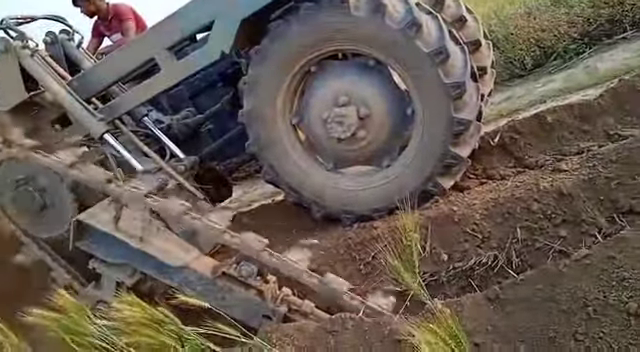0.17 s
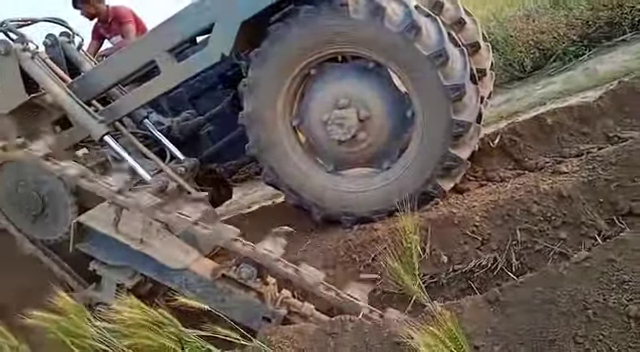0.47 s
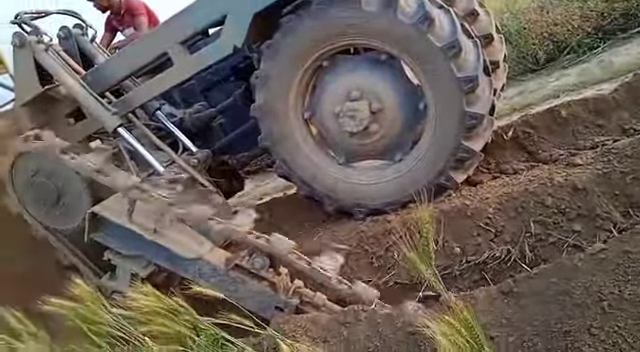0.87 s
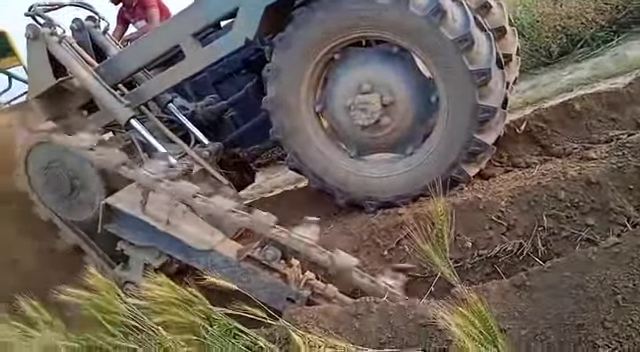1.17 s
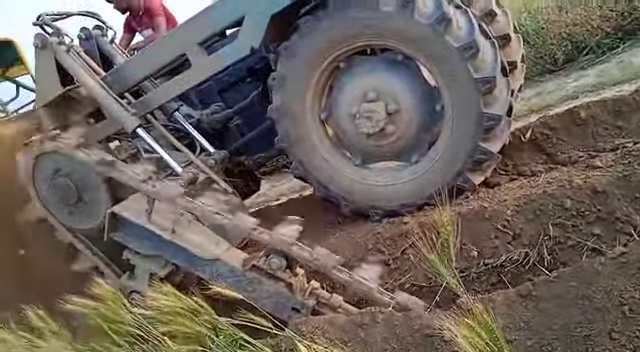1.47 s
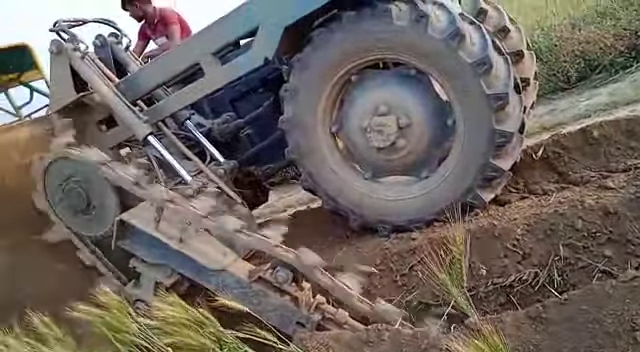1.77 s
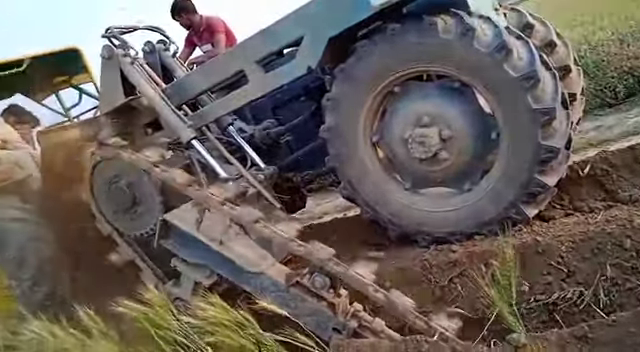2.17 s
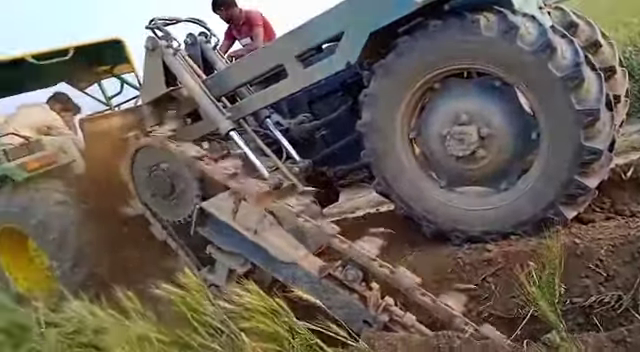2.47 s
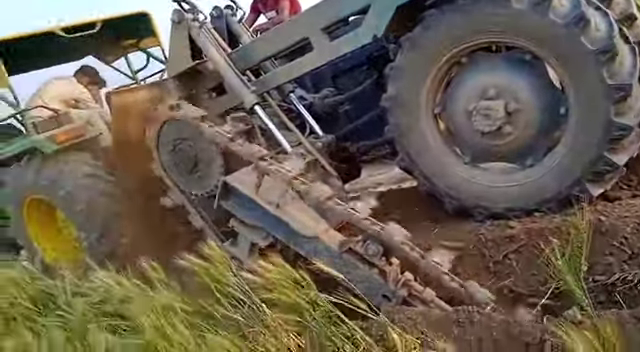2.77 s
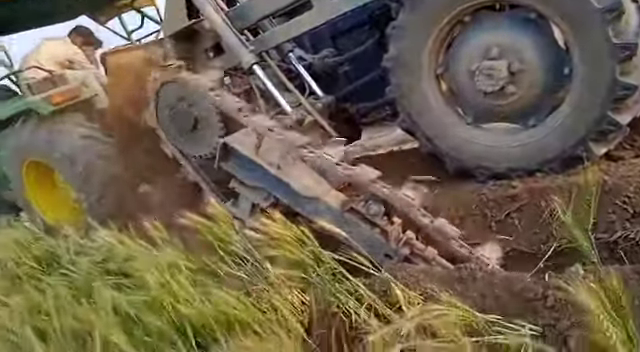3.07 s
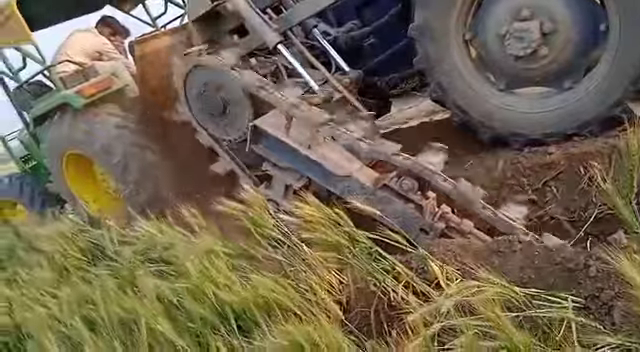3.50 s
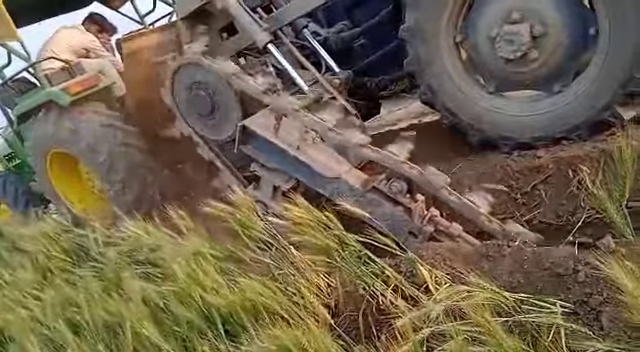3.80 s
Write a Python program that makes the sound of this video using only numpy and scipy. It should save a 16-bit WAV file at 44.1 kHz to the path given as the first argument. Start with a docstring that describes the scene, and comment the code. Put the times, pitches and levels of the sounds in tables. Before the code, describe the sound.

A four-cylinder tractor diesel knocks rapidly and unevenly throughout, with trencher chain links ticking and clinking over gritty soil roar; a second tractor drones faintly behind. Open field, close phone microphone, squashed peaks and little deep bass.

```python
"""A four-cylinder diesel tractor knocks and drones while its chain trencher clinks through soil.
Each firing strikes the block, whose modes ring and decay, and sends a puff through the exhaust resonances.
Loose steel links and stones ring the same way; a narrow noise band makes the gear whine.
Soil and fan are patchy shaped noise below, and a second tractor drones in the background."""
import sys
import numpy as np
from scipy import signal
from scipy.fft import rfft, irfft, next_fast_len
from scipy.io import wavfile
from scipy.ndimage import uniform_filter1d, map_coordinates

SR = 44100
rng = np.random.default_rng(int(sys.argv[2]) if len(sys.argv) > 2 else 0)


def persist_wave(psi):
    """Save psi, clipped to +-1, as 16-bit WAV."""
    counts = np.round(np.clip(psi, -1, 1) * 32767).astype(np.int16)
    wavfile.write(sys.argv[1], SR, np.atleast_2d(counts).T)


def boost(x):
    """Linear amplitude factor 10**(x/20) for a level x in decibels (scalar or array-like)."""
    u = np.asarray(x, float) / 20
    return 10 ** u


N = 173754

# Engine speed. Each row: time in seconds, engine cycles per second.
ENGINE_SPEED = [(0, 17.84), (1.7, 17.83), (1.95, 17.99), (2.3, 17.9), (2.6, 17.83), (2.95, 17.6),
                (3.3, 17.83), (3.94, 17.9)]
# Engine effort. Each row: time in seconds, level in dB before the gain of each source.
EFFORT = [(0.03, -26.5), (0.58, -25.5), (0.87, -26.5), (1.67, -28), (1.96, -27.5), (2.07, -26), (2.33, -26),
          (3.0, -27.5), (3.62, -27), (3.9, -28)]
# Rattle of chain and valves. Each row: time in seconds, level in dB before the gain of each source.
RATTLE_LEVEL = [(0.03, -33), (0.7, -37), (1.11, -36.5), (1.64, -37), (2.18, -32), (2.3, -33.5), (2.65, -37),
                (3.26, -42), (3.37, -39), (3.9, -36.5)]
# Knock strength of the cylinders in firing order, relative level in dB.
CYLINDER_FORCE = [-2.5, 0.5, -4.5, -4.5]
# Modes of the engine block. Each row: centre in Hz, spread in Hz, relative level in dB.
BLOCK_MODES = [(910, 90, -8), (1040, 90, -8), (1345, 130, -4), (1725, 130, 0), (2070, 250, -17),
               (2459, 350, -3.5), (3165, 300, -5)]
# Hard knocks. Each row: start in seconds, level in dB before the common gain, ring in Hz.
HARD_KNOCKS = [(0.015, -15, 2710), (0.0542, -10.5, 1640), (0.113, -16, 1830), (0.167, -9.5, 1730),
               (0.1832, -5.5, 1730), (0.223, -12, 1775), (0.3014, -18.5, 2460), (0.368, -15.5, 1040),
               (0.386, -14.5, 1150), (0.449, -14.5, 1610), (0.55, -18.5, 2466), (0.615, -17, 1295),
               (0.6563, -15.5, 2484), (0.7814, -12, 1644), (0.8404, -19, 1640), (1.0096, -14.5, 2030),
               (1.291, -25.5, 1780), (1.3467, -19.5, 1617), (1.4004, -13.5, 1870), (1.4152, -17.5, 2326),
               (1.5186, -15, 1297), (1.583, -15.5, 1350), (1.6263, -20, 2416), (1.682, -11.5, 1670),
               (1.7869, -20, 2380), (1.8487, -23.5, 2300), (1.8602, -17.5, 2000), (1.8735, -15.5, 2406),
               (1.9043, -14.5, 1930), (1.9602, -10.5, 1765), (2.0133, -18.5, 1700), (2.0308, -15, 1350),
               (2.0705, -10.5, 1570), (2.1286, -13, 1787), (2.1821, -14, 1680), (2.1998, -12, 1740),
               (2.3457, -15, 1875), (2.358, -12.5, 1720), (2.4039, -21, 2370), (2.4176, -12, 1807),
               (2.4571, -14.5, 1350), (2.5288, -13, 1280), (2.5575, -18, 2640), (2.6854, -10.5, 1726),
               (3.0215, -33, 1910), (3.0744, -25, 1697), (3.1969, -14, 1750), (3.2104, -12.5, 1660),
               (3.3633, -17.5, 1630), (3.432, -12, 1790), (3.5956, -19.5, 2280), (3.7519, -18.5, 2350),
               (3.8059, -18, 2404), (3.8756, -17.5, 1714), (3.915, -18, 1506), (0.6714, -14, 1900),
               (0.6824, -12.5, 1070), (2.6974, -11, 1490), (2.9244, -16, 1604)]
# Loud chain clinks. Each row: start in seconds, level in dB before the common gain, ring in Hz.
LOUD_CLINKS = [(0.0525, -36, 6680), (0.1401, -22.5, 6630), (0.2234, -18, 6630), (0.3072, -15.5, 6580),
               (0.3571, -17, 7220), (0.416, -26.5, 6000), (0.5387, -20, 6000), (0.615, -19, 6240),
               (0.6603, -26.5, 6150), (0.6784, -19, 6220), (0.6982, -17, 6150), (0.74, -25, 6200),
               (0.8187, -24.5, 7130), (0.995, -15, 7040), (1.186, -27.5, 6120), (1.208, -23, 6130),
               (1.4188, -19, 6110), (1.541, -20.5, 7030), (1.569, -21.5, 6420), (1.734, -18, 6470),
               (1.8347, -18.5, 6750), (1.921, -16, 6040), (2.0133, -17, 6560), (2.0707, -15, 6680),
               (2.13, -17.5, 6450), (2.2388, -12, 6550), (2.4609, -10.5, 6530), (2.5516, -24, 6350),
               (2.5676, -17, 6100), (2.6304, -16.5, 6180), (2.7442, -22.5, 6350), (2.9122, -19.5, 7180),
               (2.995, -18, 6100), (3.1977, -21.5, 6200), (3.2138, -18, 6270), (3.2375, -15.5, 6430),
               (3.4344, -8, 6110), (3.5289, -9, 6560), (3.5544, -17, 6780), (3.598, -14, 6200),
               (3.696, -26, 7170), (3.7246, -19, 6080), (3.7805, -18.5, 6850), (3.8233, -21, 6080),
               (3.862, -23, 6780), (3.9013, -22, 6280), (3.918, -16.5, 6040), (2.9287, -17, 6130),
               (3.023, -17.5, 6360), (3.2504, -20, 6750)]
# Lower pings of loose steel. Each row: start in seconds, level in dB before the common gain, ring in Hz.
STEEL_PINGS = [(0.0173, -16, 3230), (0.222, -22.5, 3140), (1.5188, -20, 3070), (1.668, -24, 3810),
               (2.1425, -21, 3310), (2.2358, -17.5, 3230), (2.631, -21, 3215), (3.0218, -25, 3020),
               (3.0757, -27.5, 3170)]
# Modes of small steel parts. Each row: centre in Hz, spread in Hz, relative level in dB.
LINK_MODES = [(3180, 300, -6.5), (4070, 180, 0), (4860, 240, -4), (5410, 200, -6), (6150, 50, -1.5),
              (6550, 77, 3.5), (7070, 250, 3), (7490, 320, -5.5)]
# Click spectrum of a knock. Each row: frequency in Hz, relative density in dB per Hz.
KNOCK_CLICK = [(290, -51), (500, -7.5), (1050, -3), (1210, 6.5), (1740, 1.5), (2470, 7), (3650, -7.5),
               (4610, -5), (6330, -8.5), (7380, -17), (8300, -48.5), (10800, -53), (18300, -120)]
# Click spectrum of a link. Each row: frequency in Hz, relative density in dB per Hz.
LINK_CLICK = [(1500, -31), (2500, -26), (3300, -12.5), (4500, -15.5), (5600, 3), (6300, 16), (7200, 2),
              (8500, -30)]
# Exhaust resonances. Each row: centre in Hz, width in Hz, relative level in dB.
EXHAUST_MODES = [(115.6, 29, -7), (178.3, 39, -6), (263.4, 115, -0.5), (318.5, 112, -1.5),
                 (445.6, 59, -6.5)]
# Exhaust throbs. Each row: centre in seconds, level in dB before the random swell.
EXHAUST_THROBS = [(.29, -36.5), (.42, -36.5), (.51, -36.5), (.64, -37), (.75, -33), (.85, -40), (.97, -38),
                  (1.16, -36), (1.28, -39), (1.45, -37.5), (1.6, -39), (1.73, -35.5), (1.921, -40),
                  (2.2, -41), (2.35, -38), (2.44, -34), (2.88, -39.5), (2.97, -37), (3.27, -38.5),
                  (3.5, -38.5), (3.719, -43.5), (3.9, -40.5)]
# Swells of the gear whine. Each row: start in seconds, length in seconds, level in dB.
WHINE_SWELLS = [(0.73, 0.058, -39), (1.083, 0.029, -46), (1.342, 0.043, -42), (1.712, 0.057, -43),
                (1.902, 0.055, -44.5), (2.013, 0.047, -44), (2.094, 0.033, -44), (2.173, 0.17, -43),
                (2.356, 0.033, -46), (2.57, 0.037, -43), (2.624, 0.033, -44), (2.684, 0.035, -43),
                (2.9, 0.046, -42), (3.082, 0.048, -52), (3.246, 0.043, -40.5), (3.543, 0.033, -40),
                (3.676, 0.03, -47), (3.712, 0.037, -44)]
# Spectrum of soil and fan. Each row: frequency in Hz, relative density in dB per Hz.
ROAR_SPECTRUM = [(15, -57.5), (25, -34), (57, -12), (155, -4.5), (264, 0), (336, -1), (602, -2.5),
                 (680, -0.5), (1030, 3.5), (1220, -5.5), (1670, 0.5), (2400, -0.5), (3720, -16.5),
                 (5360, -34.5), (6510, -13), (7530, -16), (8300, -65), (10800, -56.5), (18300, -120)]
# Spectrum of the second tractor. Each row: frequency in Hz, relative density in dB per Hz.
SECOND_SPECTRUM = [(380, -28.5), (480, -10), (600, -5), (720, 1.5), (900, -32)]
# Loudness of the second tractor. Each row: time in seconds, level in dB before the random waver.
SECOND_LEVEL = [(0, -50.5), (1.6, -46.5), (2.4, -39), (3.94, -44)]
# Echoes from ground and machine. Each row: delay in seconds, relative level in dB.
NEAR_ECHOES = [(.0017, -25), (.0043, -19.5), (.0071, -20), (0.012, -14.5), (0.0201, -15.5)]


def unit(x):
    """Normalisation: divide a signal by its rms."""
    return x / np.sqrt(np.mean(x ** 2) + 1e-20)


def curve(rows, at=None):
    """Linear interpolation of a level over time, per sample or at given times."""
    s, value = np.transpose(rows)
    return np.interp(np.arange(N) / SR if at is None else at, s, value)


def wobble(rate):
    """Slow random modulation: a smooth curve through rate random knots per second."""
    knots = rng.standard_normal(int(N * rate / SR) + 4)
    return map_coordinates(knots, [np.arange(N) * rate / SR])


def filtered(x, response):
    """Linear filtering: the spectrum is multiplied by a response of frequency."""
    m = next_fast_len(N + SR // 2)
    return irfft(rfft(x, m) * response(np.fft.rfftfreq(m, 1 / SR)), m)[:N]


def colour(points):
    """Spectral shaping: gain interpolated in dB over log frequency."""
    f, db = np.transpose(points)
    return lambda hz: boost(np.interp(np.log(hz + 1), np.log(f + 1), db))


def place(s, grains):
    """Superposition: add one row of samples at each start time."""
    at = np.round(np.asarray(s) * SR).astype(int)[:, None] + np.arange(grains.shape[1])
    return np.bincount(at.ravel(), grains.ravel(), N + SR)[:N]


def scattered(per_s, level, gain_db, scatter_db):
    """Random impacts: uniform times, and skewed levels of which a few are loud."""
    u = rng.random((int(per_s * N / SR), 2))
    s = u[:, 0] * N / SR
    return s, curve(level, s) + gain_db - scatter_db * np.log(u[:, 1] + 0.04)


def rings(s, db, hz, t60, rough_hz):
    """Damped free vibration: decaying tones whose randomly drifting phase broadens the line."""
    t = np.arange(SR // 12) / SR
    steps = rng.standard_normal((len(s), len(t))) * np.sqrt(2 * np.pi * rough_hz / SR)
    drift = np.cumsum(steps, axis=1)
    onset = 1 - np.exp(-t / 0.00048)
    fall = boost(db[:, None] - 60 * t / t60[:, None]) * onset
    cycles = hz[:, None] * t + rng.random((len(s), 1))
    return place(s, fall * np.sin(2 * np.pi * cycles + drift))


def cracks(s, db, spectrum):
    """Contact noise: each impact excites a short, decaying burst of coloured noise."""
    gain_db, t60_s = -3.5, 0.026
    t = np.arange(SR // 25) / SR
    shape = place(s, boost(db[:, None] + gain_db - 60 * t / t60_s))
    burst = shape * unit(filtered(rng.standard_normal(N), colour(spectrum)))
    low_hz = spectrum[1][0]  # the lows made by the envelope are removed
    return filtered(burst, lambda hz: hz ** 2 / (hz ** 2 + low_hz ** 2))


def struck(s, db, modes, click, t60, scatter_db, count):
    """Modal excitation: a blow rings modes spread evenly through the table from a random start, and cracks."""
    pick = (rng.random((len(s), 1)) + np.arange(count) / count) % 1
    z = np.clip(rng.standard_normal((len(s), count, 3)), -2, 2)
    hz, spread, level = np.moveaxis(np.array(modes)[(pick * len(modes)).astype(int)], 2, 0)
    tone_db = db[:, None] + level + scatter_db * z[..., 0]
    tone_hz = hz + spread / 2 * z[..., 1]
    tone_t60 = t60 * np.exp(0.42 * z[..., 2])
    tones = rings(np.repeat(s, count), tone_db.ravel(), tone_hz.ravel(), tone_t60.ravel(), rough_hz=60)
    return tones + cracks(s, db, click)


def listed_blows(rows, gain_db, t60, click, rough_hz, crack_db):
    """Single-mode impact: each listed blow rings at its own pitch and cracks."""
    s, db, hz = np.transpose(rows)
    tones = rings(s, db + gain_db, hz, np.full(len(s), t60), rough_hz)
    return tones + cracks(s, db + gain_db + crack_db, click)


def firings():
    """Crank kinematics: integrated speed gives the phase in firings, their times and cylinders."""
    first_cycle_s = 0.0553
    cycles = np.cumsum(curve(ENGINE_SPEED)) / SR
    cylinders = len(CYLINDER_FORCE)
    phase = cylinders * (cycles - cycles[round(first_cycle_s * SR)] + 1)
    k = np.arange(np.ceil(phase[0]), phase[-1]).astype(int)
    return phase, np.interp(k, phase, np.arange(N) / SR), k % cylinders


def diesel_knock(s, force_db, z):
    """Combustion knock: the pressure jump of each firing excites all modes of the block."""
    gain_db, scatter_db = -0.5, 3
    db = curve(EFFORT, s) + gain_db + force_db + scatter_db * z
    return struck(s, db, BLOCK_MODES, KNOCK_CLICK, 0.034, scatter_db=2.5, count=7)


def valve_ticks(s, force_db, z):
    """Valve impact: small steel parts ring briefly at each firing."""
    gain_db, scatter_db = 1, 4.5
    db = curve(RATTLE_LEVEL, s) + gain_db + force_db + scatter_db * z
    return struck(s, db, LINK_MODES, LINK_CLICK, 0.012, scatter_db=7.5, count=4)


def throbs():
    """Amplitude modulation: the exhaust idles faintly and swells in short bell-shaped throbs."""
    idle_db, half_width_s = -46, 0.034
    t = np.arange(N) / SR
    swells = sum(boost(db) * np.exp(-((t - s) / half_width_s) ** 2) for s, db in EXHAUST_THROBS)
    return boost(idle_db) + swells


def pipe(hz):
    """Resonance: parallel band-pass modes of the exhaust, alternating in sign."""
    total = 0
    for k, (centre, width, db) in enumerate(EXHAUST_MODES):
        damping = 1j * hz * width
        total = total + (-1) ** k * boost(db) * damping / (centre ** 2 - hz ** 2 + damping)
    return total


def exhaust(s, z):
    """Resonant filtering: firing puffs, mostly smeared into noise, pass the pipe modes twice."""
    pulse_share, swell_db = 0.098, -0.3  # share of power in the puffs
    puffs = unit(place(s, boost(3.3 * z[:, None])))
    gas = np.sqrt(pulse_share) * puffs + np.sqrt(1 - pulse_share) * rng.standard_normal(N)
    resonant = unit(filtered(filtered(gas, pipe), pipe))
    return throbs() * boost(swell_db * wobble(7)) * resonant


def engine():
    """Periodic excitation: firings drive knock, valve ticks and exhaust, with a tone at their rate."""
    jitter_s, tone_db, tone_waver_db = 0.0012, -49, 3
    phase, s, cylinder = firings()
    z = np.clip(rng.standard_normal((len(s), 3)), -2, 2)
    s = np.abs(s + jitter_s * z[:, 1])
    force_db = np.array(CYLINDER_FORCE)[cylinder]
    knock = diesel_knock(s, force_db, z[:, 0])
    valves = valve_ticks(s, force_db, z[:, 2])
    hard = listed_blows(HARD_KNOCKS, -4.5, 0.056, KNOCK_CLICK, rough_hz=60.3, crack_db=0)
    tone = boost(tone_db + tone_waver_db * wobble(8.6)) * np.sin(2 * np.pi * phase)
    return knock + valves + hard + tone + exhaust(s, z[:, 0])  # shared scatter of knock and puff


def chain():
    """Random impact: links tick over the sprocket, some clink or ping loudly, stones strike the frame."""
    tick_times, tick_db = scattered(260, RATTLE_LEVEL, gain_db=-8, scatter_db=5)
    ticks = struck(tick_times, tick_db, LINK_MODES, LINK_CLICK, 0.018, scatter_db=1, count=2)
    grit_times, grit_db = scattered(220, EFFORT, gain_db=-9, scatter_db=4)
    grit = struck(grit_times, grit_db, BLOCK_MODES, KNOCK_CLICK, 0.012, scatter_db=5, count=2)
    clinks = listed_blows(LOUD_CLINKS, -1, 0.028, LINK_CLICK, rough_hz=90, crack_db=-11)
    pings = listed_blows(STEEL_PINGS, -0.5, 0.047, LINK_CLICK, rough_hz=59, crack_db=-3)
    return ticks + grit + clinks + pings


def whine():
    """Narrow-band noise: a fuzzy gear tone idles faintly and swells in short bursts."""
    centre_hz, width_hz, idle_db = 4355, 40, -54.5
    t = np.arange(N) / SR
    swell = sum(boost(db) * np.exp(-(2 * (t - s) / length - 1) ** 4) for s, length, db in WHINE_SWELLS)
    tone = unit(filtered(rng.standard_normal(N), lambda hz: np.exp(-((hz - centre_hz) / width_hz) ** 2)))
    steady = tone / (np.abs(signal.hilbert(tone)) + 1)  # evens out the envelope
    return (swell + boost(idle_db)) * unit(steady)


def roar():
    """Broadband noise: soil and fan, patchy in time and frequency, follow the effort dB for dB."""
    level_db, patchy_db = -30, 3
    z = signal.stft(rng.standard_normal(N + 512), nperseg=512)[2]
    field = uniform_filter1d(uniform_filter1d(rng.standard_normal(z.shape), 6, 0), 8, 1)
    noise = signal.istft(z * boost(patchy_db * unit(field)), nperseg=512)[1][:N]
    effort = curve(EFFORT)
    return boost(level_db + effort - effort.mean()) * unit(filtered(noise, colour(ROAR_SPECTRUM)))


def second_tractor():
    """Band-shaped noise: a wavering drone grows as the phone turns towards it, then eases."""
    drone = unit(filtered(rng.standard_normal(N), colour(SECOND_SPECTRUM)))
    return boost(curve(SECOND_LEVEL) + 2.6 * wobble(10)) * drone


def response_dip(hz):
    """Response dip: the microphone or machine body takes up less sound near 590 Hz."""
    centre_hz, width_octaves, depth_db = 590, 0.2, -6
    octaves = np.log2((hz + 1) / centre_hz)
    return boost(depth_db * np.exp(-(octaves / width_octaves) ** 2))


def scene():
    """Reflection and superposition: machine and near echoes over the roar, beside a second tractor."""
    machine = engine() + chain() + whine()
    echoes = sum(boost(db) * np.pad(machine, (round(s * SR), 0))[:N] for s, db in NEAR_ECHOES)
    return (filtered(machine + echoes + roar(), response_dip) + second_tractor())[None]


def band_limit(x):
    """A steep low-pass at the top of the band."""
    return signal.sosfilt(signal.butter(12, 8580, fs=SR, output="sos"), x)


def record(dry):
    """Saturation and band limiting: the phone squashes peaks softly, cuts deep bass and steeply treble."""
    squash_top, low_cut_hz, low_cut_power = 0.42, 68, 4.3
    top_hz, fall_db_per_khz, deepest_db = 8050, 52.5, 68
    squashed = squash_top * np.tanh(dry[0] / squash_top)

    def response(hz):
        """Band limiting: a bass roll-off times a steep treble slope."""
        low = 1 / np.sqrt(1 + (low_cut_hz / (hz + 1)) ** low_cut_power)
        return low * boost(-np.clip(fall_db_per_khz * (hz - top_hz) / 1000, 0, deepest_db))

    finished = filtered(squashed, response)[None]
    return band_limit(finished)


dry = scene()
out = record(dry)
persist_wave(out)
```